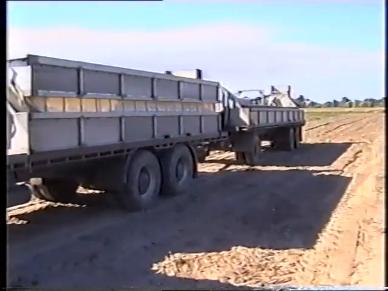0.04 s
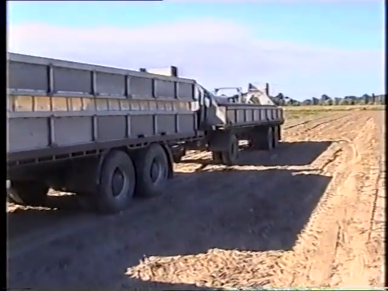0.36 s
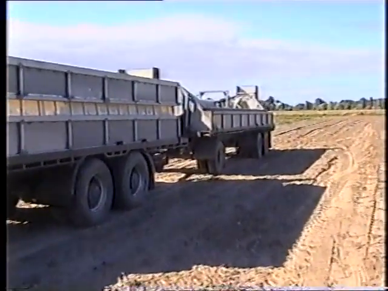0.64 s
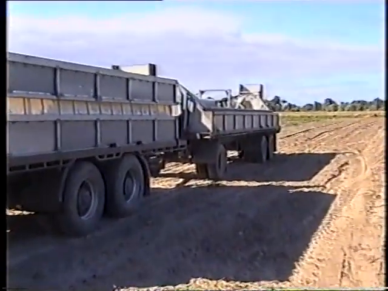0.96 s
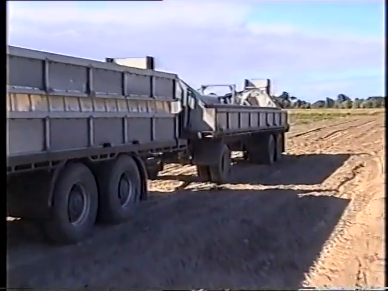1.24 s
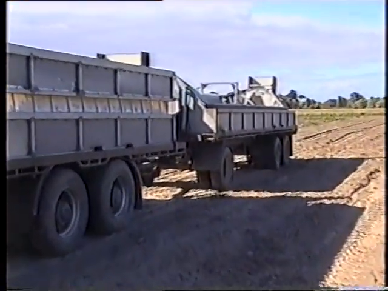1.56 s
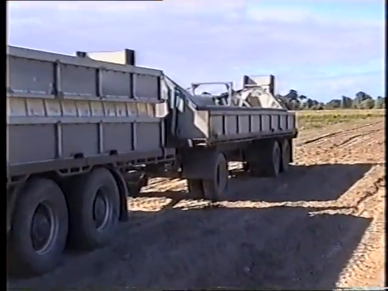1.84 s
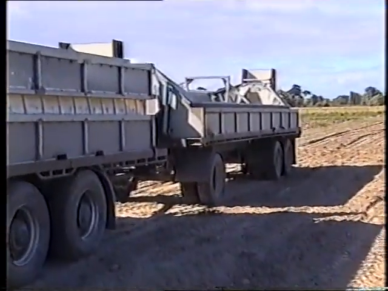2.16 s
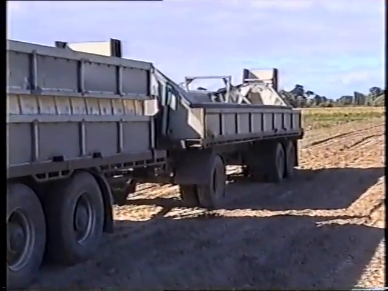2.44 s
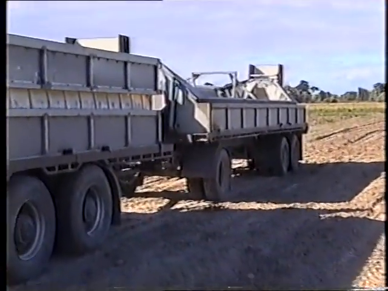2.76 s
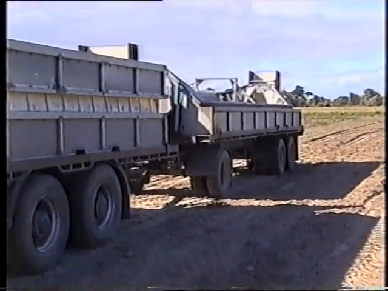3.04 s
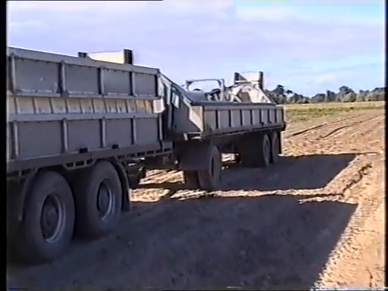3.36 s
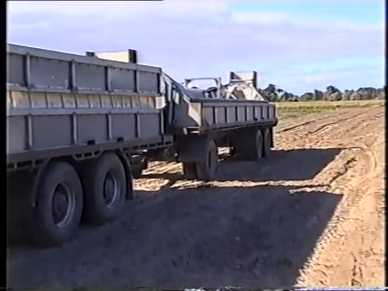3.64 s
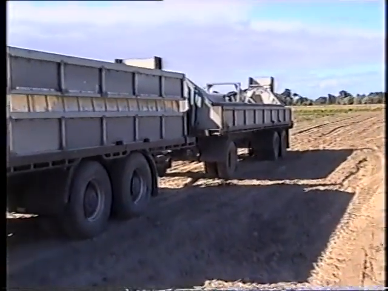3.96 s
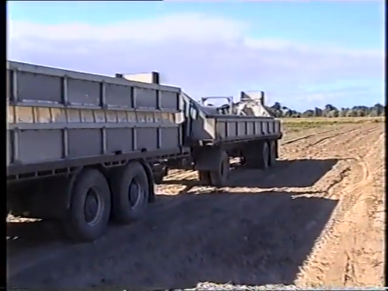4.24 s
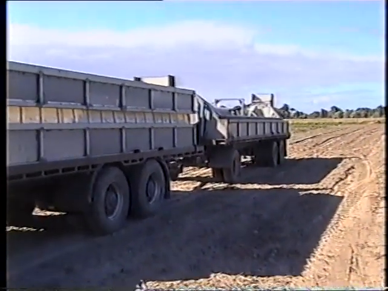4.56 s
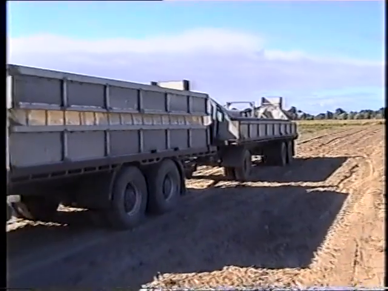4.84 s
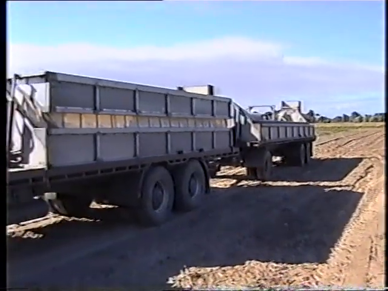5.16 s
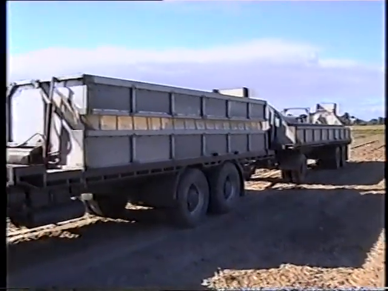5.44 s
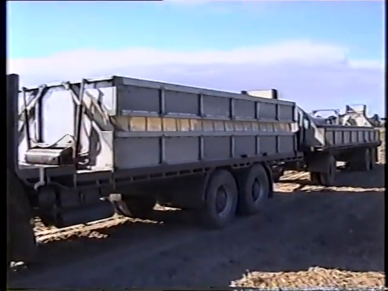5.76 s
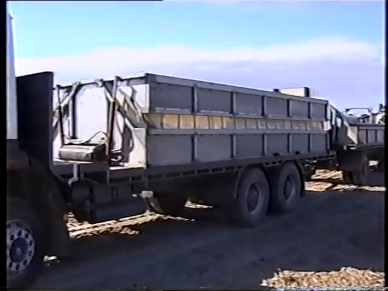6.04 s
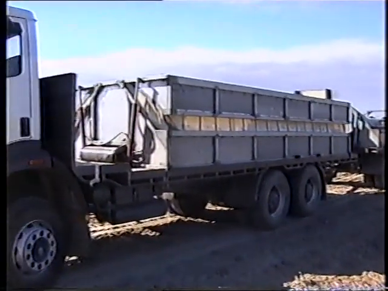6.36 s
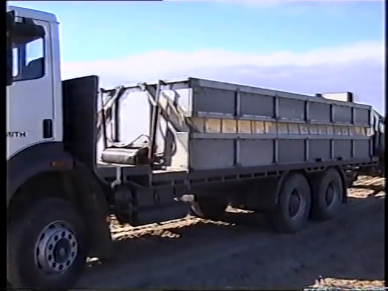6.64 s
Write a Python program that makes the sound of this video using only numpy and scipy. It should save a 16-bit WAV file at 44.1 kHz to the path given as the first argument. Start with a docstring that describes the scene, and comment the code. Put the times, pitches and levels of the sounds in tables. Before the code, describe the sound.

Wind buffets the microphone with uneven thumps and crackles while a truck runs underneath, its drone rising at the end.

```python
"""A dry, open field: gusty wind buffets a camera microphone beside a tipper truck with its engine running.
Turbulent pressure on the diaphragm thumps, slaps and rasps; the camera's limiter ducks the hardest blows.
Underneath, the truck hums, roars and hisses, clearer as the camera turns to its cab, where a drone climbs.
A small bird chirps faintly far off, and a faint regular tick runs through the sound."""
import sys
import numpy as np
from scipy import signal
from scipy.fft import rfft, irfft, next_fast_len
from scipy.io import wavfile
from scipy.ndimage import uniform_filter1d, minimum_filter1d, map_coordinates

SR = 44100
rng = np.random.default_rng(int(sys.argv[2]) if len(sys.argv) > 2 else 0)


def transcribe(u):
    """Save the signal u as a 16-bit wav file named by the first command-line argument.

    u: samples, shape (n,) or (channels, n), limited to [-1, 1]; the rate is SR.
    q: integer samples, one column per channel.
    """
    v = np.clip(np.atleast_2d(u).T, -1, 1)
    q = np.round(v * 32767).astype(np.int16)
    wavfile.write(sys.argv[1], SR, q)


N = 304290
T = np.arange(N) / SR

# spectrum of the crackle of torn air: frequency_hz, density_db
CRACKLE_SPECTRUM = [(200, -120), (1200, -3), (2500, 4), (3600, 1), (5000, -5.5), (7000, -14.5),
                    (10000, -20.5), (12500, -30.5), (16000, -120)]
# pressure fronts that strike the microphone all at once: start_s, level_db
AIR_SLAPS = [(0.132, -27), (.538, -23), (.717, -29), (0.789, -29), (.829, -20), (1.548, -26), (1.668, -18),
             (1.881, -25), (2.349, -18), (2.509, -26.5), (2.667, -19.5), (2.789, -23), (2.871, -25),
             (3.146, -23), (3.208, -28), (3.26, -24), (3.305, -17), (3.504, -22), (3.553, -21.5),
             (3.768, -24), (3.879, -28), (3.93, -17), (4.103, -20.5), (4.529, -24), (4.586, -19.5),
             (5.003, -24), (5.331, -22), (6.386, -33)]
EDDY_RISE, EDDY_FALL, EDDY_EDGE = 0.42, 0.51, 1.75  # two shares of an eddy's length; flank steepness


def amp(db):
    """Decibels to amplitude ratio."""
    return 10 ** (np.asarray(db) / 20)


def unit(x):
    """Normalisation to rms 1."""
    return x / np.sqrt(np.mean(x ** 2) + 1e-20)


def along(points, hz):
    """Interpolation of (frequency_hz, value) points on a logarithmic frequency axis."""
    frequencies, values = np.transpose(points)
    return np.interp(np.log(hz + 1), np.log(frequencies + 1), values)


def ramp(start_s, length_s):
    """A linear rise from 0 to 1."""
    return np.clip((T - start_s) / length_s, 0, 1)


def swell(peak_s, rise_s, fall_s, edge=2):
    """A generalised Gaussian envelope of height 1; a higher edge steepens its flanks."""
    out = np.zeros(N)
    near = slice(*np.searchsorted(T, [peak_s - 3 * rise_s, peak_s + 3 * fall_s]))
    t = T[near] - peak_s
    out[near] = np.exp(-np.abs(t / np.where(t < 0, rise_s, fall_s)) ** edge)
    return out


def wobble(rate):
    """Smooth random modulation of rms 1: a spline through rate knots a second."""
    return unit(map_coordinates(rng.standard_normal(N // 8), [T * rate + 2], mode="wrap"))


def filtered(x, response):
    """Linear filtering: the spectrum of x times a frequency response."""
    size = next_fast_len(N + 8192)
    return irfft(rfft(x, size) * response(np.fft.rfftfreq(size, 1 / SR)), size)[..., :N]


def rush(spectrum):
    """Coloured noise of rms 1, highly coherent between the two channels."""
    # side signal relative to mid: frequency_hz, side_db
    stereo_width = [(30, -10), (60, -19), (120, -48), (250, -64), (500, -49.5), (1000, -45.5), (2000, -30),
                    (8000, -24.5), (12000, -15)]

    def response(hz):
        return amp(along(spectrum, hz)) * np.array([np.ones_like(hz), amp(along(stereo_width, hz))])

    mid, side = filtered(rng.standard_normal((2, N)), response)
    return unit(np.array([mid + side, mid - side]))


def even(x, size):
    """Division by the running rms holds the power of a noise steady over size samples."""
    power = uniform_filter1d(uniform_filter1d(np.mean(x ** 2, axis=0), size), size)
    return x / np.sqrt(np.abs(power) + 1e-9)


def flutter(per_second, decay_s):
    """Shot noise of small eddies, mean 0 and rms 1: each arrives at once and decays; pile-ups saturate."""
    kicks = (rng.random(N) < per_second / SR) * rng.uniform(.4, 1, N)
    level = signal.lfilter([1], [1, -np.exp(-1 / (decay_s * SR))], kicks)
    smoothed = unit(uniform_filter1d(level - level.mean(), size=40))
    saturated = np.tanh(smoothed / 3)
    return unit(saturated - saturated.mean())


def narrow(hz, width_hz):
    """Narrow-band noise of rms 1: a resonance that follows hz with random amplitude and phase."""
    phase = 2 * np.pi * np.cumsum(hz) / SR
    return wobble(width_hz) * np.sin(phase) + wobble(width_hz) * np.cos(phase)


def noise_floor():
    """Stationary broadband noise, heard as a faint high hiss."""
    # colour of the hiss: frequency_hz, density_db
    spectrum = [(1000, -4), (4000, -2), (8000, 5.5), (10000, -2.5), (12500, -5), (13500, -20), (16000, -60)]
    return amp(-59.0) * rush(spectrum)


def ticks():
    """Impulses with exponential decay click about three times a second; some beats are silent."""
    # clicks: start_s, peak_db
    clicks = [(.201, -29), (.515, -32), (.828, -25.5), (1.142, -34), (1.455, -27), (1.769, -22.5),
              (2.082, -28), (2.396, -21), (2.71, -34), (3.337, -19.5), (3.963, -19), (4.277, -23),
              (4.59, -15), (4.905, -32), (5.217, -27), (5.531, -15.5), (5.845, -24), (6.472, -24)]
    corner_hz = 2500
    impulses = np.zeros(N)
    for start_s, db in clicks:
        impulses[round(start_s * SR)] = amp(db)
    return signal.lfilter([1], [1, -np.exp(-2 * np.pi * corner_hz / SR)], impulses)


def bird():
    """Distant hoarse whistles glide, mostly downward; the gusty air modulates their amplitude."""
    # whistles: start_s, length_s, start_hz, end_hz, level_db
    chirps = [(3.747, 0.028, 4400, 3400, -50), (3.958, 0.03, 4050, 4180, -41), (4.05, .05, 4150, 4000, -55),
              (4.161, .04, 4100, 3770, -42), (4.21, .03, 4200, 3960, -48), (4.192, .012, 7900, 8500, -46),
              (4.54, 0.043, 5860, 3970, -52), (4.71, .026, 5500, 3670, -45.5),
              (4.813, .04, 4070, 4090, -45.5), (5.172, .03, 9200, 9400, -53)]
    noise_share, spread_hz = .4, 300  # noisy share of a chirp's power; its bandwidth
    waver_hz = 130 * wobble(460)
    tremble = amp(2.2 * wobble(200))
    hoarseness = (wobble(spread_hz) + 1j * wobble(spread_hz)) / np.sqrt(2)
    voice = np.sqrt(1 - noise_share) + np.sqrt(noise_share) * hoarseness
    out = np.zeros(N)
    for start_s, length_s, start_hz, end_hz, db in chirps:
        on = (T > start_s) & (T < start_s + length_s)
        progress = (T[on] - start_s) / length_s
        pitch_hz = start_hz + (end_hz - start_hz) * progress + waver_hz[on]
        envelope = np.sqrt(np.abs(np.sin(np.pi * progress)))
        carrier = np.exp(2j * np.pi * np.cumsum(pitch_hz) / SR)
        out[on] += amp(db) * envelope * np.real(voice[on] * carrier)
    return tremble * out


def turn():
    """The camera's bearing, from trailer (0) to cab (1); the sound ends before the turn does."""
    return ramp(start_s=4.53, length_s=3.37)


def hum():
    """The truck's low hum: a pure tone with slight random frequency modulation."""
    pitch_hz = 50.9 + 0.13 * wobble(2.7)
    return amp(-48) * np.sin(2 * np.pi * np.cumsum(pitch_hz) / SR)


def fan():
    """Broadband fan noise and diffuse, wavering metal resonances both grow toward the cab."""
    # colour of the fan's hiss: frequency_hz, density_db
    spectrum = [(100, -60), (800, 20), (1800, -3), (2500, 2), (2950, 0.5), (3500, 0.5), (4100, 1.5),
                (5200, -3), (7000, -11.5), (10000, -20.5), (12500, -40), (16000, -120)]
    # metallic ring near the cab: centre_hz, width_hz, level_db
    resonances = [(3010, 260, -55), (6200, 120, -73)]
    ring_gain = np.sqrt(turn()) * amp(1.1 * wobble(7))
    ring = sum(amp(db) * narrow(hz + 44.9 * wobble(9), width_hz) for hz, width_hz, db in resonances)
    hiss_db = -47.5 + 14.5 * turn() + 1.8 * wobble(27)
    return amp(hiss_db) * rush(spectrum) + ring_gain * ring


def machinery_hiss():
    """Dry noise bursts with a broad, scraping steel resonance; each starts quickly and fades slowly."""
    # bursts from the machinery: peak_s, length_s, level_db
    bursts = [(0.446, 0.27, -46), (4.013, 0.25, -49.5), (5.416, 0.54, -50.5), (5.863, 0.062, -44),
              (5.93, 0.12, -44), (6.173, 0.051, -47), (6.61, 0.076, -41), (6.8, 0.32, -43)]
    # colour of the bursts: frequency_hz, density_db
    spectrum = [(200, -60), (1500, -4), (2600, -4), (3000, 1), (3600, -2.5), (5200, -6), (6500, -11.5),
                (8500, -17.5), (12000, -35), (16000, -120)]
    envelope = sum(amp(db) * swell(s, 0.2 * length, 0.96 * length) for s, length, db in bursts)
    steel = amp(-7) * narrow(3200 + 50 * wobble(18), width_hz=720)
    return envelope * amp(2.0 * wobble(70)) * (rush(spectrum) + steel)


def engine():
    """A broadband roar, joined near the cab by a narrow-band drone that climbs and rings on brief notes."""
    # colour of the roar: frequency_hz, density_db
    roar_spectrum = [(20, -28), (60, -35), (130, -8), (260, -2), (450, 3), (650, -0.5), (900, -6.5),
                     (1300, -11.5), (2000, -26), (4000, -70), (14000, -120)]
    # notes on which the drone rings out: peak_s, length_s, pitch_hz, level_db
    drone_notes = [(5.87, 0.12, 432, -27.5), (6, 0.18, 446.4, -28), (6.153, 0.19, 505, -31),
                   (6.17, 0.12, 389, -29), (6.33, 0.093, 439, -25), (6.52, 0.2, 645, -32.5),
                   (6.59, 0.23, 544, -26.5), (6.88, 0.11, 659, -29)]
    base_hz, rev_hz, climb_hz_per_s, climb_start_s = 435, 537, 605, 6.74
    rev = ramp(start_s=6.37, length_s=0.1205)
    drone_hz = base_hz + (rev_hz - base_hz) * rev + climb_hz_per_s * np.maximum(T - climb_start_s, 0)
    roar_db = -34.5 + 8.5 * turn() + 1.46 * wobble(25)
    roar = amp(roar_db) * even(rush(roar_spectrum), size=2000)
    drone = amp(-34.5) * ramp(start_s=5.8, length_s=0.06) * narrow(drone_hz, width_hz=180)
    notes = np.zeros(N)
    for peak_s, length_s, hz, db in drone_notes:
        envelope = amp(db) * swell(peak_s, length_s / 2, length_s / 2)
        notes += envelope * narrow(hz + 5.98 * wobble(40), width_hz=48)
    return roar + drone + notes


def dips(share):
    """Amplitude modulation: the level dips briefly here and there, by a share of each listed depth."""
    # brief drops in level: centre_s, half_length_s, depth_db
    drops = [(0.102, 0.022, -4), (0.815, 0.027, -4.5), (0.977, 0.0093, -4), (1.104, .016, -2),
             (1.3, 0.01, -1), (1.33, 0.011, -2), (1.902, .009, -3), (2.179, 0.0091, -3.5),
             (2.477, 0.043, -4.5), (2.742, 0.012, -1), (3.122, 0.043, -3), (3.498, 0.0068, -5),
             (3.868, 0.012, -2), (4.086, 0.012, -3), (4.246, 0.013, -4.5), (4.55, 0.015, -3.5),
             (4.823, 0.062, -2.5), (5.05, 0.015, -4), (5.32, 0.0083, -2), (5.668, 0.016, -2.5)]
    return amp(share * sum(db * swell(s, half, half) for s, half, db in drops))


def lulls():
    """The flow stalls for an instant before each slap, so the gain sinks."""
    lead_s, depth_db = 0.004, -2
    stalls = sum(swell(s - lead_s, 1.03 * lead_s, lead_s, edge=2.6) for s, _ in AIR_SLAPS)
    return amp(depth_db * stalls)


def tears():
    """Fine turbulence: the sharpest eddies rip past with a bright, ragged crackle."""
    # rips of air: peak_s, length_s, level_db
    rips = [(0.567, 0.016, -28), (0.726, 0.014, -34.5), (0.748, 0.017, -36.5), (0.844, 0.023, -35),
            (1.948, .05, -45), (2.855, .008, -36), (2.966, 0.0044, -31), (3.306, 0.016, -38),
            (3.658, 0.013, -35.5), (3.94, 0.013, -41), (4.008, .012, -37)]
    # colour of a rip: frequency_hz, density_db
    spectrum = [(200, -70), (1200, -2), (2500, 1.5), (4200, 2.5), (5600, -7), (7500, -20.5), (10000, -36),
                (13000, -40), (16000, -120)]
    envelope = sum(amp(db) * swell(s, EDDY_RISE * length, EDDY_FALL * length, EDDY_EDGE)
                   for s, length, db in rips)
    return envelope * amp(1.3 * flutter(per_second=290, decay_s=0.0022)) * rush(spectrum)


def slaps():
    """Pressure transients: a steep front of air with a little crackle dies within a few cycles."""
    # colour of a slap: frequency_hz, density_db
    spectrum = [(20, -50), (120, -12), (300, 1), (600, 1.5), (900, -3.5), (1400, -15), (3000, -35.5),
                (8000, -70)]
    rise_s, fall_s = 0.00095, 0.0067
    envelope = sum(amp(db) * swell(s + rise_s, rise_s, fall_s, edge=1.2) for s, db in AIR_SLAPS)
    return envelope * (even(rush(spectrum), size=160) + amp(-17.5) * rush(CRACKLE_SPECTRUM))


def eddy_envelopes(gust_db):
    """Incoherent eddies add in power, giving a thump and a rasp envelope; weak ones follow the gusts."""
    # strong eddies that hit the microphone: peak_s, length_s, level_db, relative_rasp_db
    strong_eddies = [(.03, 0.051, -18.5, -12.5), (.135, 0.011, -23, -13.5), (.175, 0.034, -33, -4),
                     (.22, 0.019, -31, -19), (.286, 0.01, -20, -11), (.332, 0.023, -21.5, -20),
                     (.41, 0.049, -25, -8), (.472, 0.022, -18, -8), (.54, 0.0097, -27, -6),
                     (.573, 0.056, -21, -5.5), (.633, 0.013, -13, -14), (.658, 0.013, -28.5, -0.5),
                     (.724, 0.018, -21.5, -13), (.75, .035, -26, -7), (.79, .01, -26, -8),
                     (.846, 0.017, -14.5, -19), (.875, 0.016, -17.5, -15.5), (.908, 0.0089, -31, -11),
                     (.958, 0.01, -16, -27), (1.005, 0.016, -24, -15), (1.135, 0.014, -27, -3.5),
                     (1.178, .016, -37, 3.5), (1.252, 0.032, -31, -2), (1.36, 0.024, -23, -7),
                     (1.395, .03, -27, -8), (1.434, 0.017, -23, -5), (1.497, 0.011, -27, -0.5),
                     (1.575, 0.037, -19, -19), (1.682, 0.019, -19, -11), (1.72, 0.025, -22, -23),
                     (1.772, 0.02, -24, -10), (1.855, 0.036, -29, -15), (1.935, 0.024, -22.5, -4.5),
                     (1.968, 0.032, -20.5, -7.5), (2.037, 0.023, -19, -6), (2.072, 0.032, -26, -3),
                     (2.12, 0.023, -18, -17), (2.155, .016, -21, -16), (2.247, 0.01, -24, -19),
                     (2.28, .03, -26.5, -11), (2.342, 0.019, -13, -14), (2.378, 0.016, -29, -7),
                     (2.537, 0.027, -37, 0), (2.586, 0.0078, -25, -6), (2.678, 0.021, -20.5, -14),
                     (2.704, 0.016, -16.5, -15), (2.756, 0.02, -35, 0), (2.808, 0.043, -18.5, -9.5),
                     (2.853, 0.011, -22, -3), (2.877, 0.0089, -20, -11), (2.91, 0.034, -20, -10.5),
                     (2.969, 0.023, -18, -11.5), (3.015, 0.01, -39, -17), (3.052, 0.011, -24.5, -10.5),
                     (3.152, 0.015, -25.5, -4.5), (3.219, 0.017, -16, -15.5), (3.265, 0.03, -21, -24),
                     (3.315, 0.019, -13.5, -12), (3.361, 0.028, -20, -9), (3.407, .013, -20, -12),
                     (3.443, .015, -22.5, -8), (3.475, 0.014, -19, -5.5), (3.526, 0.02, -23, -12.5),
                     (3.565, 0.041, -19, -17), (3.628, 0.019, -17.5, -17), (3.662, 0.021, -21, -15),
                     (3.7, 0.016, -18.5, -15), (3.89, 0.021, -17.5, -13), (3.95, 0.059, -22.5, -10.5),
                     (4.015, 0.035, -17.5, -16.5), (4.06, 0.014, -30, -17), (4.112, 0.01, -17, -24),
                     (4.155, 0.04, -25.5, -12), (4.2, 0.018, -15.5, -15), (4.228, 0.019, -26.5, -3),
                     (4.285, 0.036, -21, -14), (4.375, 0.011, -18, -27), (4.41, 0.033, -18, -13.5),
                     (4.454, 0.013, -17, -33), (4.534, 0.02, -23, -11.5), (4.597, 0.039, -20, -10.5),
                     (4.625, 0.019, -24.5, -13), (4.668, 0.032, -21.5, -14.5), (4.722, 0.011, -24.5, -7),
                     (4.745, 0.031, -18.5, -22), (4.775, 0.035, -25.5, -11), (4.888, 0.047, -20.5, -12.5),
                     (4.947, 0.044, -24, -8.5), (5.005, 0.013, -16, -16.5), (5.088, .03, -19.5, -15),
                     (5.215, 0.01, -20.5, -11), (5.334, 0.019, -19.5, -11.5), (5.36, 0.026, -37.5, 2),
                     (5.617, 0.043, -16.5, -12), (5.695, 0.015, -22, -21), (5.73, 0.018, -26, -8.5),
                     (5.778, 0.025, -24.5, -29), (6.06, 0.035, -18.5, -13)]
    weak_per_s, weak_length_s, weak_rasp_db = 4, 0.027, -15.5
    gap, scatter_db = rng.standard_normal(size=(80, 2)).T
    times = np.cumsum(np.exp(.5 * gap)) / weak_per_s  # log-normal intervals
    levels_db = -28.5 + np.interp(times, T, gust_db) + scatter_db
    weak_eddies = [(s, weak_length_s, db, weak_rasp_db) for s, db in zip(times, levels_db) if s < T[-1]]
    thump_power, rasp_power = np.zeros(N), np.zeros(N)
    for peak_s, length_s, db, rasp_db in list(strong_eddies) + weak_eddies:
        push = swell(peak_s, EDDY_RISE * length_s, EDDY_FALL * length_s, EDDY_EDGE)
        thump_power += amp(db) ** 2 * push
        rasp_power += amp(db + rasp_db) ** 2 * push
    return np.sqrt(thump_power), np.sqrt(rasp_power)


def wind():
    """Turbulent pressure on the diaphragm: the flow buffets, eddies thump, and both rasp and crackle."""
    # flow over the microphone, relative to its usual strength: time_s, strength_db
    flow = [(0, 6), (.15, -0.5), (.5, -1.5), (1.0, -1.5), (1.335, 2.5), (1.358, 7.5), (1.47, 7.5),
            (1.54, 3), (1.69, 8.5), (1.87, 7.5), (1.96, 7.3), (2.158, 5.5), (2.172, 3.5), (2.37, 0.5),
            (2.48, -6.5), (2.85, 2.5), (3.1, -1), (3.33, 1), (3.65, -1.5), (3.82, -7), (4.0, -3), (4.35, 3),
            (4.5, -6), (4.8, -7), (4.93, -3), (5.3, -4.5), (6.9, -4.5)]
    # buffeting of the diaphragm: frequency_hz, density_db
    buffet_spectrum = [(20, -40), (55, -14), (85, -9), (140, -3.5), (240, 2), (340, -0.5), (500, -2),
                       (800, -11.5), (1400, -35), (3000, -70), (8000, -120)]
    # deep push of large eddies: frequency_hz, density_db
    thump_spectrum = [(20, -40), (55, -60), (85, -12), (140, 0), (220, 3), (330, 1.5), (500, -9),
                      (800, -20), (1400, -31), (3000, -40), (8000, -120)]
    # boom under the strongest eddies: frequency_hz, density_db
    boom_spectrum = [(20, -50), (55, -27), (80, -5.5), (130, 1), (190, 0.5), (270, -12), (600, -72),
                     (2000, -120)]
    # rasp of torn air: frequency_hz, density_db
    rasp_spectrum = [(20, -60), (200, -9), (500, 7), (900, 4), (1500, -0.5), (2500, -8), (3600, -17.5),
                     (5000, -26), (7000, -40), (16000, -120)]
    # whoosh of a strong gust round the camera: frequency_hz, density_db
    whoosh_spectrum = [(20, -60), (150, -14), (320, -2), (650, 1.5), (950, -6), (1500, -18), (3000, -36),
                       (8000, -120)]
    flow_db = np.interp(T, *np.transpose(flow))
    gust_db = 0.37 * flow_db
    flow_rasp = amp(-37.5 + 0.89 * flow_db)  # grows faster than the buffet, so gusts are brighter
    eddy_thump, eddy_rasp = eddy_envelopes(gust_db)
    rasp_gain = np.hypot(flow_rasp, eddy_rasp)
    depth_db = 2 * (1 - 0.096 * np.maximum(flow_db, 0))  # a strong gust fills the gaps between eddies
    flutter_db = depth_db * flutter(per_second=130, decay_s=0.0024)  # common to all bands but the boom
    buffet = amp(-28 + gust_db + flutter_db) * even(rush(buffet_spectrum), size=500)
    thump = eddy_thump * amp(0.29 * flutter_db) * even(rush(thump_spectrum), size=400)
    boom_gain = amp(-24) * (eddy_thump / amp(-15.5)) ** 1.7  # 1.7 dB per dB of eddy
    boom = boom_gain * even(rush(boom_spectrum), size=700)
    rasp_db = 0.89 * flutter_db + 1.74 * flutter(per_second=330, decay_s=0.0021)
    rasp = amp(rasp_db) * rush(rasp_spectrum)
    crackle_db = -10 + 0.95 * flutter_db + 2.46 * flutter(per_second=340, decay_s=0.0028)
    crackle = amp(crackle_db) * rush(CRACKLE_SPECTRUM)
    whoosh_db = -40 + 1.61 * flow_db + wobble(23) + 0.6 * flutter_db
    whoosh = amp(whoosh_db) * rush(whoosh_spectrum)
    return buffet + whoosh + thump + boom + rasp_gain * (rasp + crackle)


def scene():
    """Superposition in a free field: the sources add with no echo."""
    wind_and_engine = dips(share=1.0) * (lulls() * (wind() + engine()) + slaps())
    steady_hiss = dips(share=0.79) * (fan() + noise_floor())
    return wind_and_engine + steady_hiss + tears() + hum() + machinery_hiss() + bird() + ticks()


def record(dry):
    """The camera's rms limiter ducks the hardest buffets but passes brief peaks; a low-pass follows."""
    threshold_db, band_limit_hz = -13.5, 15900
    sense, hold = round(0.0028 * SR), round(0.004 * SR)  # reaction and hold times in samples
    power = uniform_filter1d(np.mean(dry ** 2, axis=0), sense)
    level = np.sqrt(np.abs(power) + 1e-12)
    target_gain = np.minimum(1, amp(threshold_db) / level)
    gain = uniform_filter1d(minimum_filter1d(target_gain, hold), hold)
    return filtered(dry * gain, lambda hz: hz < band_limit_hz)


dry = scene()
out = record(dry)
transcribe(out)
```